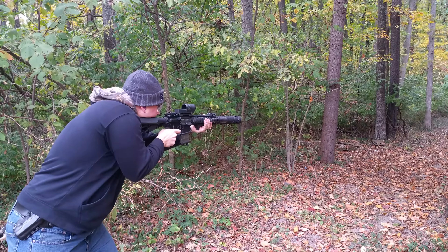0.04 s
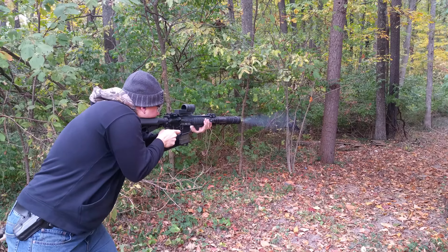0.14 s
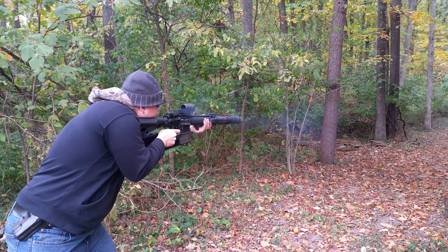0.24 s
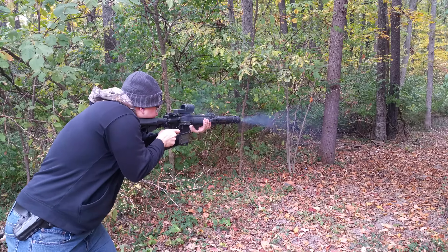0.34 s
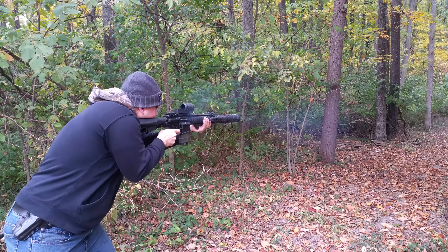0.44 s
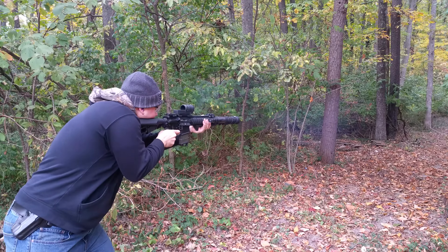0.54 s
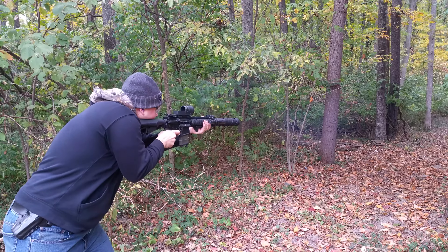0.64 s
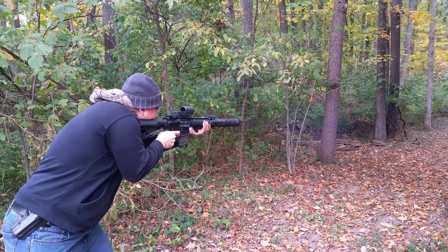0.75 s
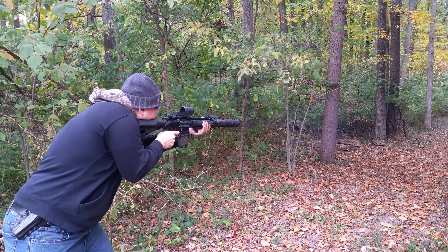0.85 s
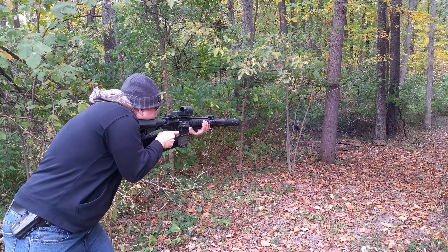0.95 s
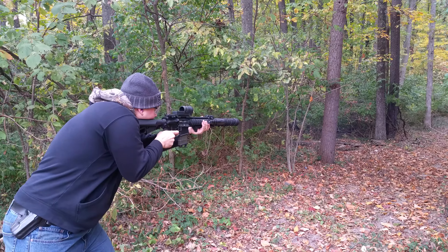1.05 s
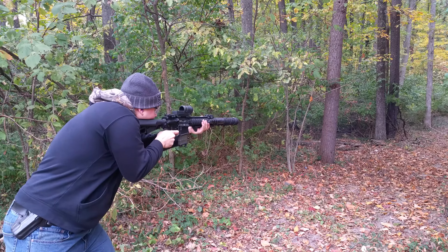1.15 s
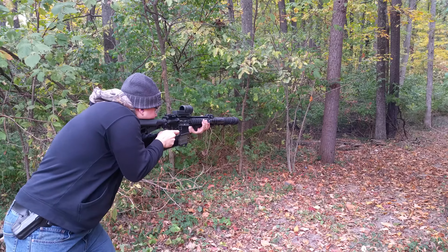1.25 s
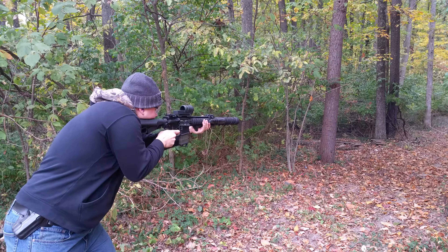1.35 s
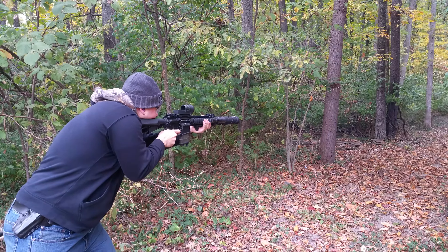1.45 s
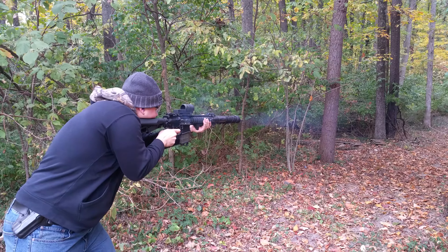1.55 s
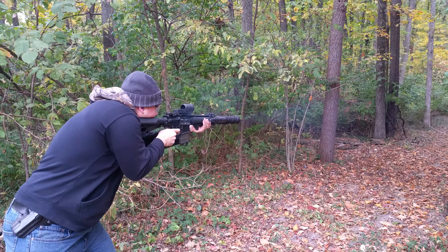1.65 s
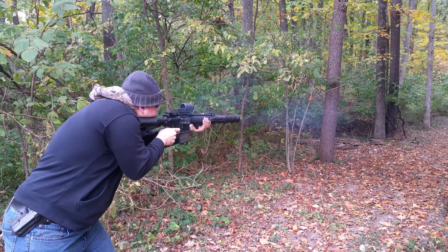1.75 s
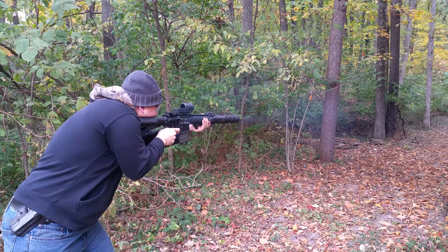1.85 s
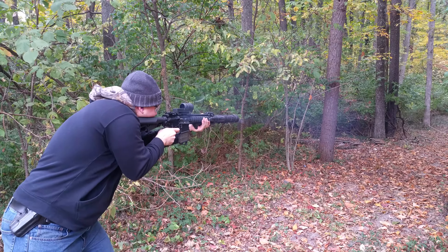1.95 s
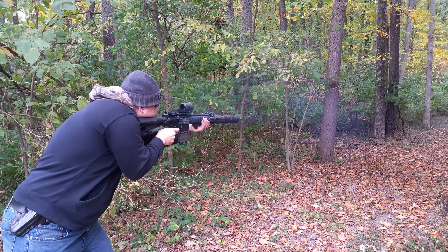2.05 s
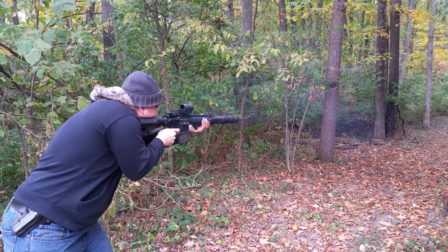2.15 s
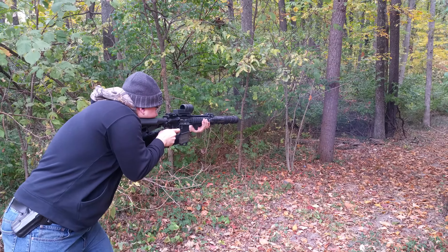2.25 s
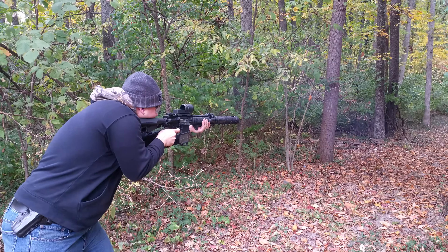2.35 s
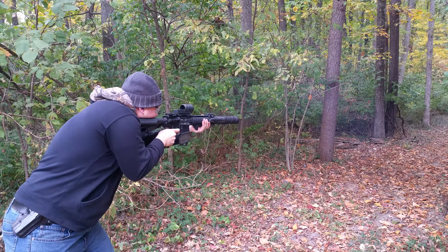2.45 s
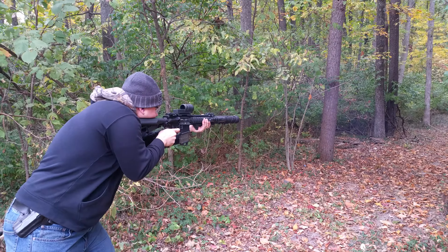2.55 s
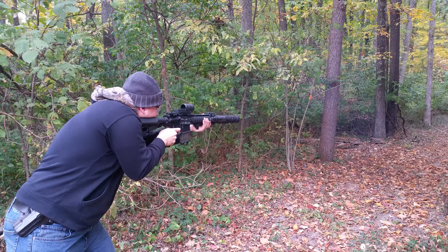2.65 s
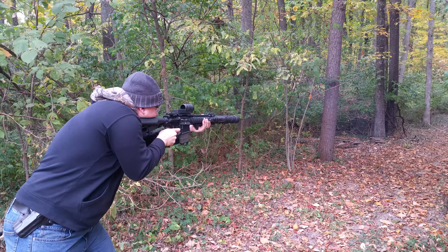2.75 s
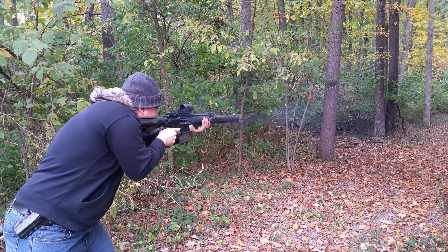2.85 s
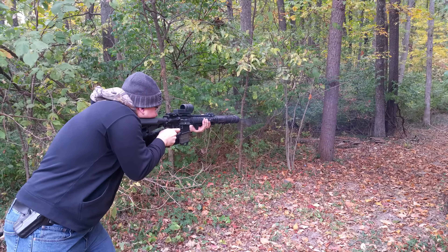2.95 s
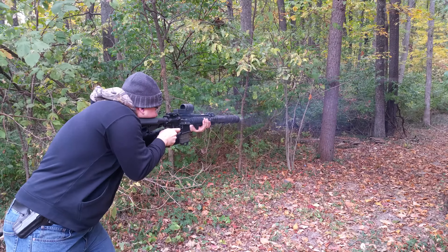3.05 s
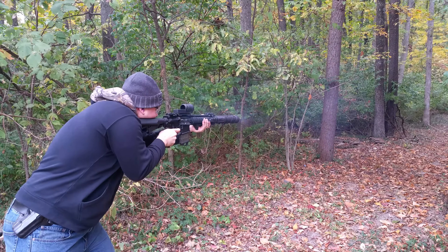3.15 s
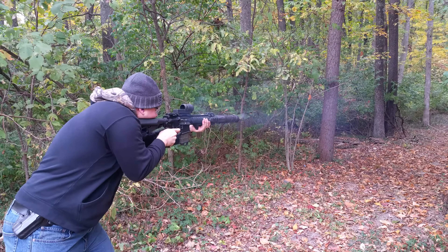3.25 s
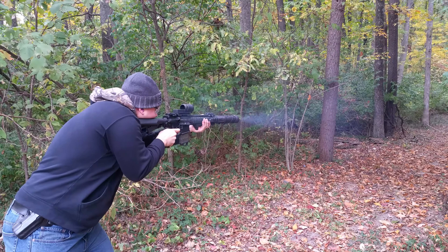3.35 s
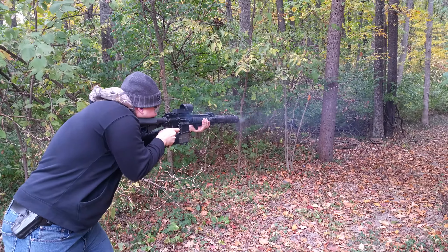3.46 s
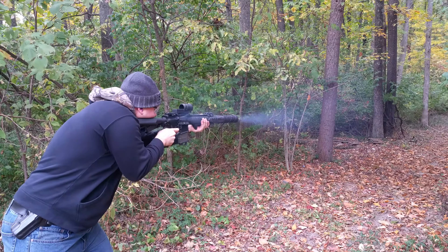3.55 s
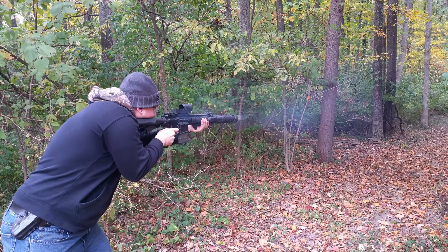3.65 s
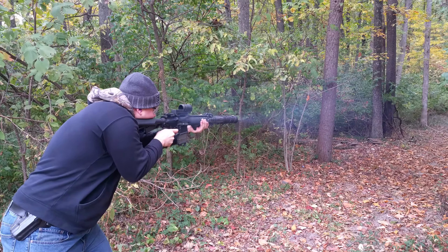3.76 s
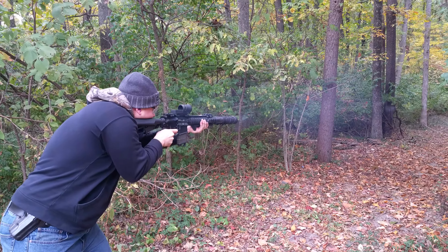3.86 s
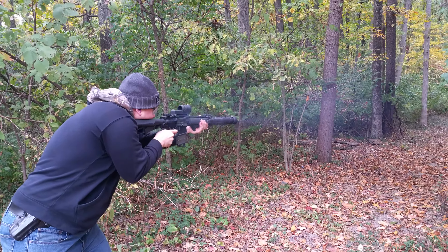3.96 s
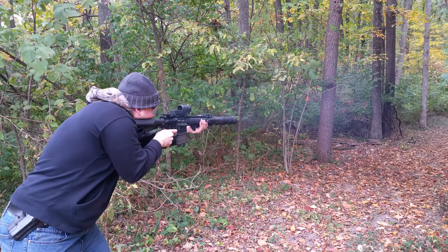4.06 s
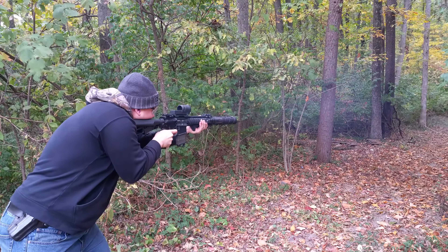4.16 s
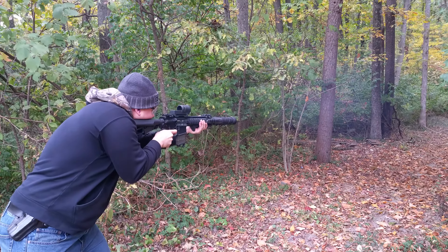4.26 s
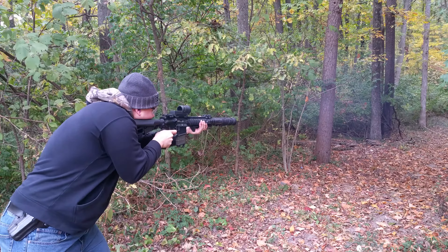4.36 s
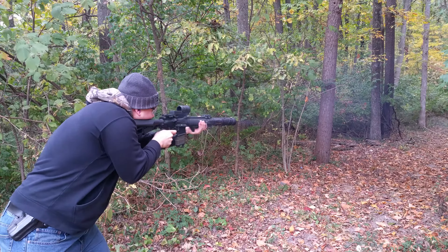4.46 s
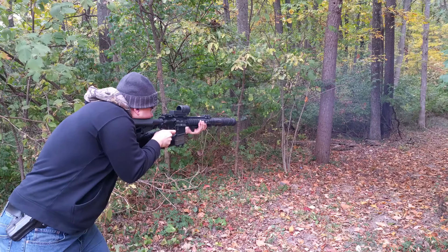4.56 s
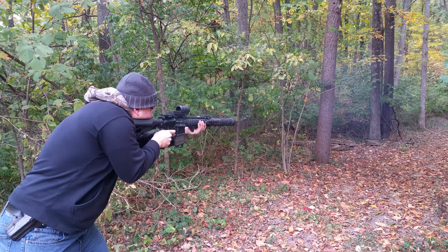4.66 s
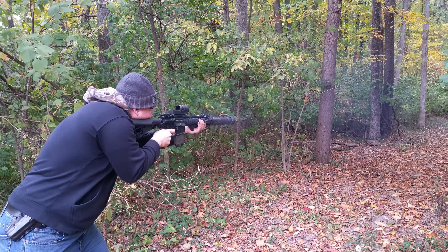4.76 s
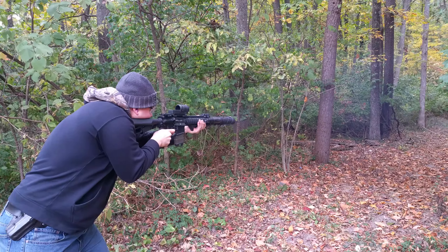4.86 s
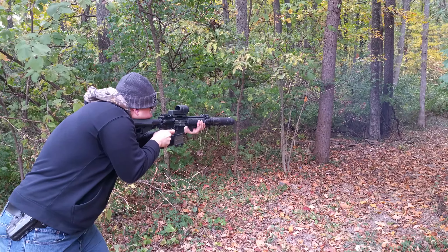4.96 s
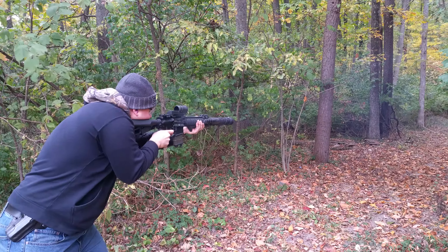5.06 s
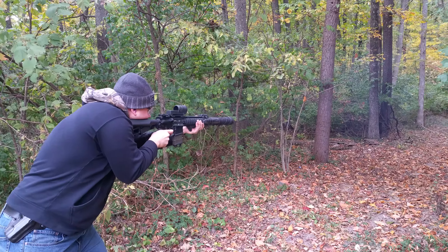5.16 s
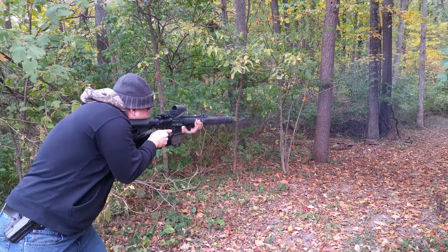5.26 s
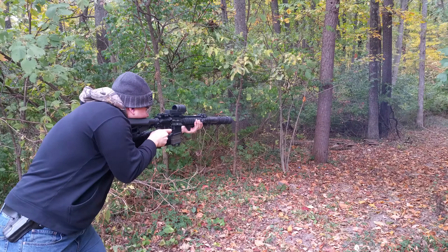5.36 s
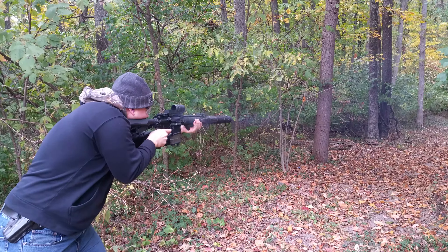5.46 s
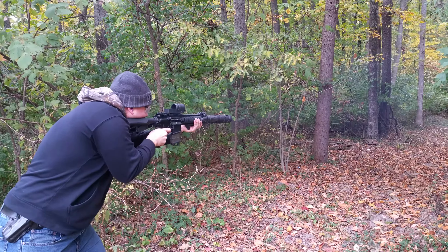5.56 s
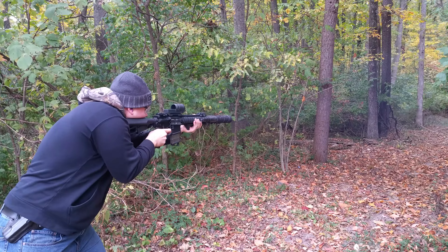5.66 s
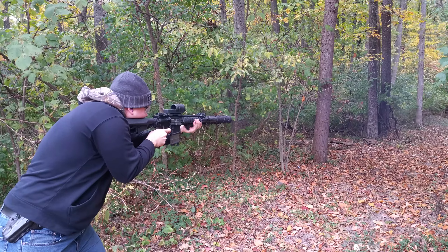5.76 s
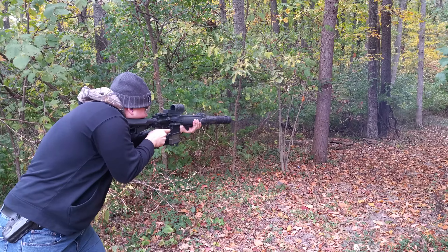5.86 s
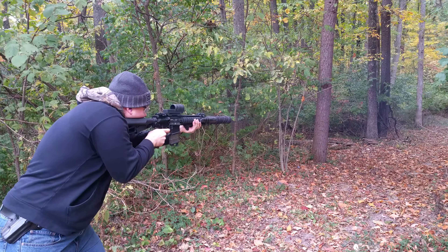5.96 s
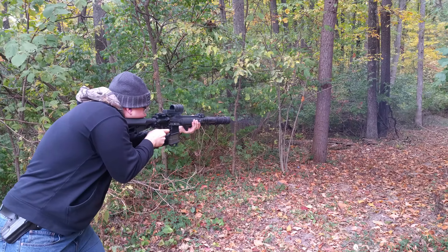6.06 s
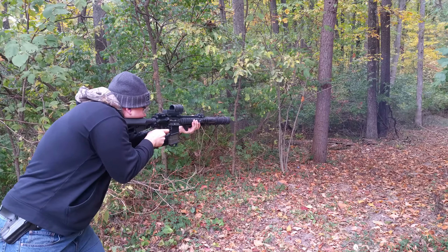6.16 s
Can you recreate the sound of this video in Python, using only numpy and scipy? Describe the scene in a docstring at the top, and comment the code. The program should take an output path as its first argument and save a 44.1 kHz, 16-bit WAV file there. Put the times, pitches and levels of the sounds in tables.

```python
"""A suppressed rifle fires nineteen shots in quick strings in open woods, a few steps from two microphone ports.
Over a quiet wash of filtered noise with low bumps, each shot is a hammer click, a sharp pressure pulse,
a rush of gas as decaying noise bands, deeper in the first shots, and the click of the closing bolt.
Stems and leaves scatter it back as a long hiss of many echoes, trunks as slaps, and some bullets strike
down range as a snap. Between strings spent cases crackle into dry leaves and the trigger clicks."""
import sys
import numpy as np
from scipy import signal
from scipy.fft import rfft, irfft
from scipy.io import wavfile
from scipy.ndimage import uniform_filter1d

SR = 44100
rng = np.random.default_rng(int(sys.argv[2]) if len(sys.argv) > 2 else 0)


def output_pcm(signal):
    """Save a mono or channel-first signal as 16-bit PCM at the path in sys.argv[1].

    Samples are clipped to [-1, 1] before scaling.
    """
    pcm = np.clip(np.atleast_2d(signal).T, -1, 1) * 32767
    wavfile.write(sys.argv[1], SR, np.round(pcm).astype(np.int16))


N = 273861


def gain_of(db):
    """Logarithmic level: decibels become an amplitude factor."""
    return np.exp(np.asarray(db) * (np.log(10) / 20))


def read(hz, points_hz, values):
    """Interpolation: points are joined by straight lines on a log-frequency axis."""
    return np.interp(np.log(hz + 1), np.log(np.asarray(points_hz) + 1), values)


def add(mix, s, sound):
    """Superposition: a sound is summed into the mix from time s, cut off at the end of the mix."""
    part = mix[:, max(round(s * SR), 0):][:, :sound.shape[-1]]
    part += sound[..., :part.shape[1]]


def colour(x, points_hz, db, size=2048):
    """Minimum-phase filtering: the spectrum is shaped causally, so nothing sounds before a click."""
    hz = abs(np.fft.fftfreq(size, 1 / SR))
    log_gain = np.log(gain_of(read(hz, points_hz, db)))
    # the Hilbert transform of the log gain gives the minimum phase
    spectrum = np.exp(np.conj(signal.hilbert(log_gain)))
    taps = np.fft.ifft(spectrum).real[:size // 2]
    taps = taps.reshape((1,) * (x.ndim - 1) + (-1,))
    return signal.oaconvolve(x, taps, axes=-1)[..., :x.shape[-1]]


def bands(x, centres_hz):
    """Spectral decomposition: overlapping bands that sum to the whole."""
    spectrum = rfft(x.astype(np.float32))
    hz = np.fft.rfftfreq(x.shape[-1], 1 / SR)
    for one in np.eye(len(centres_hz)):
        yield irfft(spectrum * read(hz, centres_hz, one).astype(np.float32))


def burst(t60, size=4096):
    """Exponential decay: two channels of noise start at once and fall 60 dB in t60 seconds."""
    t = np.arange(size) / SR
    return rng.standard_normal((2, size)) * gain_of(-60 * t / t60)


# still air in the woods: (frequency [Hz], spectral level [dB])
AIR = [(20, -48.5), (100, -38), (150, -44.5), (280, -46), (700, -47.5), (1300, -59), (3000, -65.5),
       (4500, -66), (7000, -65), (15000, -69.5)]
# soft bumps of air on the microphone: (time [s], level [dB])
BUMPS = [(.003, -39), (0.027, -42), (0.861, -41), (2.59, -55)]


def air(bump_hz=94, cycles=0.41):
    """Broadband ambience: filtered noise is the wash of far foliage, brief damped sines the low bumps."""
    out = colour(rng.standard_normal((2, N)), *np.transpose(AIR))
    t = np.arange(SR // 8) / SR
    u = t * bump_hz / cycles  # the envelope peaks at u = 1
    bump = u * np.exp(1 - u) * np.sin(2 * np.pi * bump_hz * t)
    for s, db in BUMPS:
        add(out, s, gain_of(db) * bump)
    return out


# one row a shot: (time [s], relative level [dB], factor on the length of the gas rush [1])
SHOTS = [(0.2497, 0.3, 0.93), (0.4403, -0.1, 0.77), (1.5936, -0.1, 0.97), (1.7841, -.2, 0.93),
         (1.967, 0.5, 0.95), (2.8756, 0.1, 1.02), (3.076, -0.45, 1.05), (3.2763, 0, .88), (3.4582, 0, 0.76),
         (3.6498, 0, 0.88), (3.851, 0.2, .8), (4.0451, 1, 0.93), (4.5485, 0.2, 0.97), (4.7696, 1, .88),
         (5.1267, 0.3, 0.92), (5.3275, 0.5, 1), (5.5407, 1, .92), (5.9469, 0.44, 0.88), (6.1602, -0.5, 1.2)]


def shots(lock_s=.0088, hammer_db=-25.0, bolt_s=0.051, bolt_db=-11):
    """Superposed impulses: the hammer falls, crack and gas follow, trunks reply and the bolt slams shut."""
    out = np.zeros((2, N))
    for (s, level_db, length), bass_db in zip(SHOTS, early_bass_db()):
        lead_s, report = crack()
        add(out, s - lock_s, gain_of(hammer_db) * steel_click(t60=0.005))
        add(out, s - lead_s, report)
        add(out, s, gain_of(level_db) * rush(bass_db, length))
        add(out, s, trunks())
        add(out, s + bolt_s, gain_of(bolt_db) * steel_click(t60=.02))
    return out


def steel_click(t60):
    """Impact excitation: a small steel part strikes home, with a faint scatter from the leaves around."""
    strike = burst(t60) + gain_of(-11.0) * burst(t60=.16)
    return colour(strike, [200, 800, 1700, 4000, 8000, 15000], [-8, -9, -1.5, -7, -2.0, -14.5])


def crack(width_s=0.00013, pulse_db=5.5, splash_db=-10, leak_db=-23, lead_s=0.0013):
    """Blast wave: gas leaks ahead of the bullet, then a pressure jump, its suction and a splash off the gun."""
    splash = burst(t60=0.031)
    u = np.arange(splash.shape[1]) / SR / width_s
    pulse = (1 - u) * np.exp(-u)  # pressure turns to suction at u = 1
    out = gain_of(leak_db) * burst(t60=.02)
    add(out, lead_s, gain_of(pulse_db) * pulse + gain_of(splash_db) * splash)
    return lead_s, out


def early_bass_db(warm_db=-1.5, cold_db=11, cold_shots=2, steepness=13):
    """Warming: a cold suppressor adds bass to the first few shots, then the extra drops away."""
    fired = np.arange(len(SHOTS))
    return warm_db + cold_db / (1 + (fired / cold_shots) ** steepness)


# gas rush by band, holds before each shot's length factor, decay besides the steady sag:
# (frequency [Hz], spectral level [dB], hold in left port [s], hold in right port [s], 60 dB decay time [s])
RUSH = [(31, -37, 0.026, 0.075, .13), (104, -10.5, 0.067, 0.082, 0.14), (294, -6.5, 0.009, 0.067, .07),
        (790, -4, 0.017, 0.062, 0.074), (1980, -7.5, 0.0041, 0.032, 0.2), (4040, -15, .055, 0.064, 0.45),
        (8100, -4, 0.0077, 0.024, 0.34), (15000, -1.5, .008, 0.031, .2)]


def rush(bass_db, length, sag_db_per_s=25, bass_hz=450, churn_db=3.0, churn_hz=2000, eddy_s=0.0055,
         hiss_db=3, hiss_hz=4300, size=16384):
    """Turbulence: gas churns in each port, longer in the right, and then decays band by band."""
    t = np.arange(size) / SR
    steps = rng.uniform(-0.82, 1, (2, size // 64))
    eddies = np.array([np.interp(t / eddy_s, np.arange(len(e)), e) for e in steps]) * np.sqrt(3)
    noise_bands = bands(rng.standard_normal((2, size)), [row[0] for row in RUSH])
    out = 0
    for band, (hz, db, left_s, right_s, t60) in zip(noise_bands, RUSH):
        after = np.maximum(t - length * np.array([[left_s], [right_s]]), 0)
        depth_db = bass_db / (1 + (hz / bass_hz) ** 2)  # the first shots are deeper
        lumps_db = churn_db * eddies / (1 + hz / churn_hz)  # eddies break up the low boom
        left_hiss_db = hiss_db / (1 + (2 * np.log2(hz / hiss_hz)) ** 4)
        port_db = np.array([[left_hiss_db], [0]])
        decay_db = sag_db_per_s * t + 60 * after / t60
        out = out + band * gain_of(db + depth_db + lumps_db + port_db - decay_db)
    return out


def stems(uneven_db=5.0, merge_s=0.22, sway_s=.00016, count=26000, size=57600):
    """Multiple scattering: one echo a stem or leaf, as (shots, ports, samples); muzzle sway shifts arrivals."""
    delay = np.linspace(.003, size / SR - .01, count) + rng.uniform(-.001, .001, count)
    sign = rng.choice([-1, 1], count)
    across = rng.uniform(-1, 1, count) * .0003  # half the delay between the ports [s], from direction
    taps = []
    for _ in SHOTS:
        # the bass repeats closely from shot to shot, the treble does not
        arrival = delay + sway_s * rng.standard_normal(count)
        # near stems crackle one by one, far ones merge into a hiss
        spread_db = uneven_db / (1 + delay / merge_s)
        strength = sign * gain_of(spread_db * np.clip(rng.standard_normal(count), -3, 3))
        # even out the local power
        strength *= np.sqrt(size / count / uniform_filter1d(strength ** 2, size=600))
        ports = []
        for side in (-1, 1):
            index = np.clip((arrival + side * across) * SR, 0, size - 1).astype(int)
            ports.append(np.bincount(index, strength, size))
        taps.append(ports)
    return np.array(taps)


# scatter from the woods: (frequency [Hz], spectral level [dB], 60 dB decay time [s])
WOODS = [(40, -42.5, 1.4), (150, -25, 1.17), (513, -26, 1.74), (775, -15.5, 1.66), (1200, -14.5, 1.49),
         (1820, -13.5, 1.43), (3000, -10, 1.07), (4360, -7, 0.83), (6000, -3, 0.64), (8200, -6.5, 0.59),
         (10800, -16.5, 0.56), (15000, -14.5, 0.41)]


def woods(echo_db=0.94, build_s=0.079, clump_db=5.5, clump_hz=1800, bass_hz=350, left_db=-1.03, right_db=0.2):
    """Reverberation: scattered echoes swell and die, the high treble first; a deeper shot echoes deeper."""
    starts, level_db, _ = np.transpose(SHOTS)
    taps = stems()
    t = np.arange(taps.shape[-1]) / SR
    swell = 1 - np.exp(-t / build_s)
    # long waves come back only from thick trees, which stand in clumps: the low echo flutters
    clumps = signal.resample(rng.uniform(-1, 1, len(t) // 350), len(t))
    tails = 0
    for band, (hz, db, t60) in zip(bands(taps, [row[0] for row in WOODS]), WOODS):
        flutter_db = clump_db * clumps / (1 + (hz / clump_hz) ** 2)
        fade = gain_of(db - 60 * t / t60 + flutter_db) * swell
        # the echo follows the strength and bass of its shot
        level = gain_of(echo_db + level_db + early_bass_db() / (1 + (hz / bass_hz) ** 2))
        tails += band * np.float32(fade) * np.float32(level)[:, None, None]
    out = np.zeros((2, N))
    for s, tail in zip(starts, tails):
        add(out, s, gain_of([[left_db], [right_db]]) * tail)
    return out


# stands of large trunks, one trunk behind another:
# (nearest [m], spacing [m], trunks [count], centre frequency [Hz], left level [dB], right level [dB])
STANDS = [(6.0, 6.6, 4, 250, 0.5, -6.5), (19.9, 2.05, 3, 1130, -9.5, 2)]


def trunks(sound_m_per_s=343, octaves=1.07, spread_db=5.0, wander_s=.0004, size=2048):
    """Discrete reflection: each large trunk returns one short slap, after the trip there and back."""
    out = np.zeros((2, SR // 2))
    grid_hz = np.geomspace(30, SR / 2, num=40)
    for nearest_m, spacing_m, count, hz, left_db, right_db in STANDS:
        bell_db = np.maximum(-4 * (np.log2(grid_hz / hz) / octaves) ** 2, -60)
        slap = colour(signal.unit_impulse(size), grid_hz, bell_db)
        for metres in nearest_m + spacing_m * np.arange(round(count)):
            ports_db = np.array([[left_db], [right_db]]) + spread_db * rng.standard_normal()
            delay_s = 2 * metres / sound_m_per_s + wander_s * rng.standard_normal()
            add(out, delay_s, gain_of(ports_db) * slap)
    return out


# bullets that land hard enough down range to be heard: (time [s], relative level [dB])
STRIKES = [(.363, 7), (1.706, 2), (1.895, 0), (2.078, 0), (3.571, 0), (3.76, 8), (3.963, -5), (4.156, -1),
           (4.881, 0), (5.652, -4), (6.057, -2)]


def strikes(left_db=-26, right_db=-16):
    """Impact noise: a bullet lands down range with a short snap, louder in the right port."""
    out = np.zeros((2, N))
    for s, db in STRIKES:
        snap = colour(burst(t60=.008), [1000, 4000, 9000, 15000], [-16, 2, -4, 2])
        add(out, s, gain_of(db) * gain_of([[left_db], [right_db]]) * snap)
    return out


# spent cases landing in dry leaves: (time [s], relative level [dB])
CASES = [(1.152, -58.5), (2.298, -51), (2.507, -56.5), (2.519, -52), (4.412, -54)]


def cases(level_db=6):
    """Granular noise: a case lands with a short, bright crackle of dry leaves."""
    out = np.zeros((2, N))
    for s, db in CASES:
        rustle = burst(t60=0.15, size=8192)
        rustle *= gain_of(3 * rng.standard_normal(rustle.shape[1]))  # uneven grains
        add(out, s, gain_of(db + level_db) * colour(rustle, [500, 3000, 8000], [-20, -4, 0]))
    return out


# trigger reset and take-up: (time [s], relative level [dB])
CLICKS = [(1.2397, -30), (1.5569, -41), (2.7603, -35)]


def trigger(level_db=-1):
    """Impact excitation: the trigger resets or takes up with a thin steel click."""
    out = np.zeros((2, N))
    for s, db in CLICKS:
        click = colour(steel_click(t60=0.033), [1500, 4000], [-9, 0])
        add(out, s, gain_of(db + level_db) * click)
    return out


def scene():
    """Superposition: still air, shots, echoes, bullet strikes, falling cases and trigger clicks sum."""
    return air() + shots() + woods() + strikes() + cases() + trigger()


def gain_control(x, boost_db=9, threshold_db=-34, recover_db_per_s=6, attack_s=0.0046):
    """Compression: quiet sound is lifted; loud sound removes the lift in a few ms, and it returns slowly."""
    power = signal.lfilter(np.ones(64) / 64, 1, (x ** 2).mean(0))
    power_db = 10 * np.log10(power + 1e-12)
    # a peak hold that falls at a steady rate
    fall_db = np.arange(N) / SR * recover_db_per_s
    held_db = np.maximum.accumulate(power_db + fall_db) - fall_db
    over_db = np.clip(held_db - threshold_db, 0, boost_db)
    lag = np.exp(-1 / (attack_s * SR))
    cut_db = signal.lfilter([1 - lag], [1, -lag], over_db)
    return x * gain_of(boost_db - cut_db)


# colour of both microphone ports: (frequency [Hz], left gain [dB], right gain [dB])
PORTS = [(1050, -1, -1.5), (2620, 2.5, 3.5), (3280, 2, 8), (4060, 1.5, 11), (4890, 1, 9), (5360, -3, 6.5),
         (6310, -17, 1.5), (6850, -14, -4), (8040, -12.5, -15), (10200, -9.5, -16), (12500, -9.5, -14.5),
         (15500, -11.5, -11.5)]


def record(dry, low_cut_hz=42, full_scale=1.0, edge_hz=15950):
    """Transduction: port resonance, loss of deep bass, gain control, flattened peaks and a band limit."""
    hz, *ports_db = np.transpose(PORTS)
    heard = np.array([colour(x, hz, db) for x, db in zip(dry, ports_db)])
    low_cut = signal.butter(2, low_cut_hz, "high", fs=SR, output="sos")
    heard = gain_control(signal.sosfilt(low_cut, heard))
    heard = heard / (1 + (heard / full_scale) ** 4) ** (1 / 4)  # soft saturation
    band_limit = signal.firwin(401, edge_hz, window=("kaiser", 8), fs=SR)
    return signal.oaconvolve(heard, band_limit[None], "same", axes=1)


dry = scene()
out = record(dry)
output_pcm(out)
```